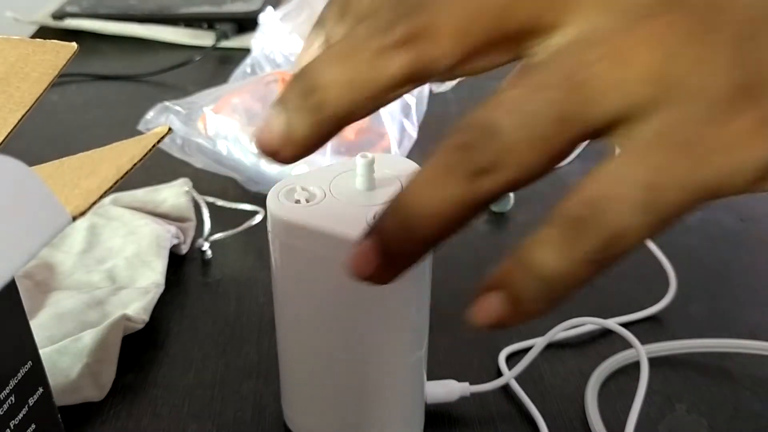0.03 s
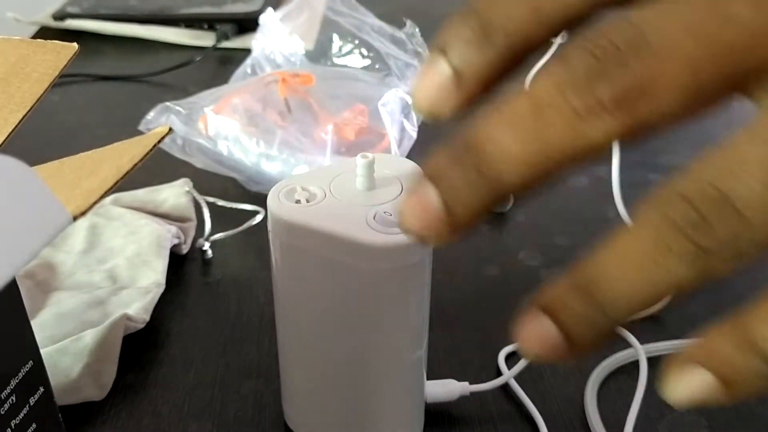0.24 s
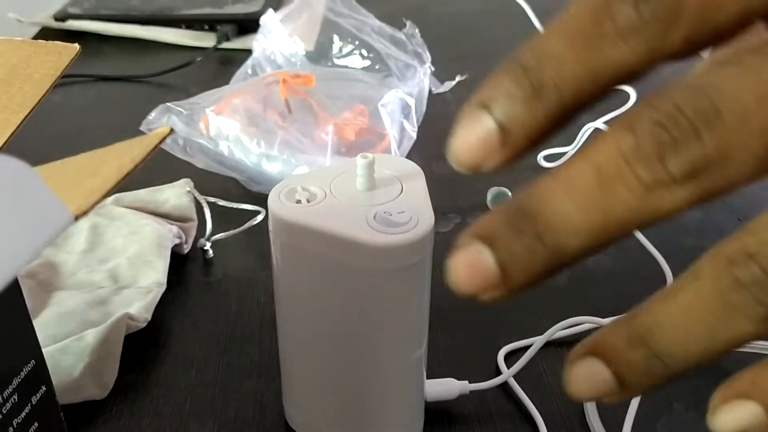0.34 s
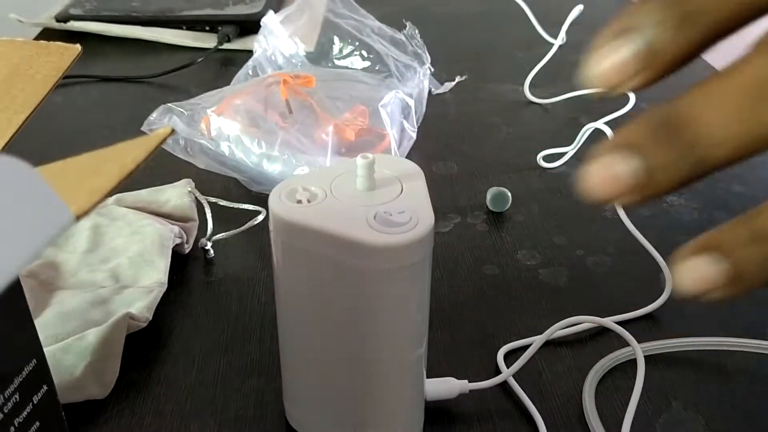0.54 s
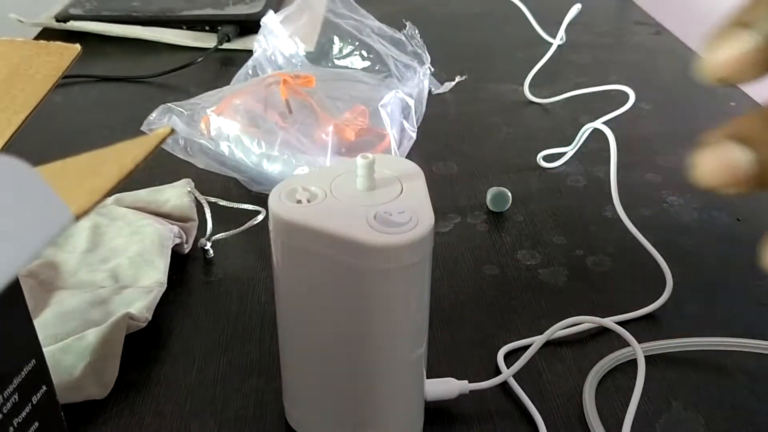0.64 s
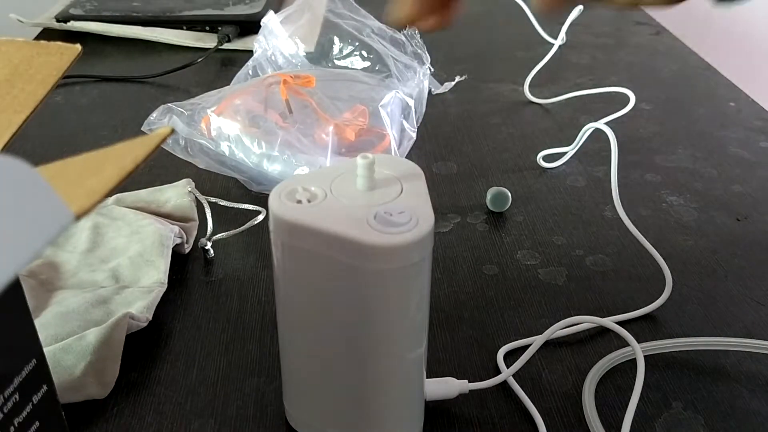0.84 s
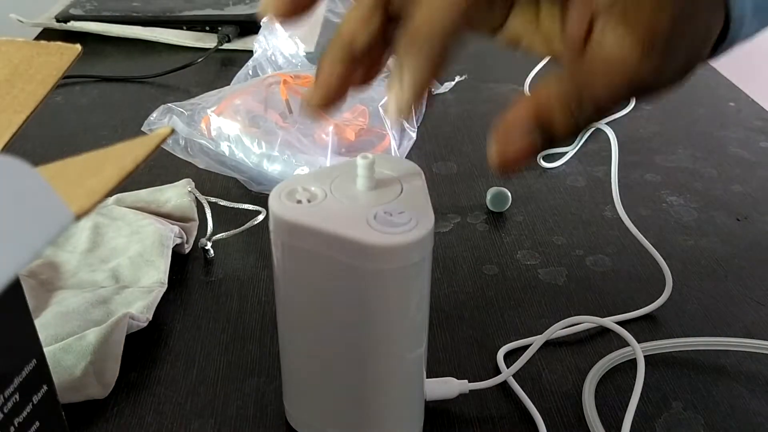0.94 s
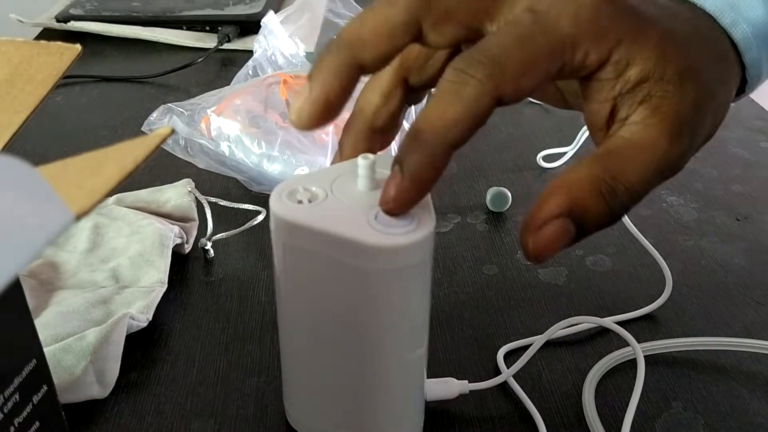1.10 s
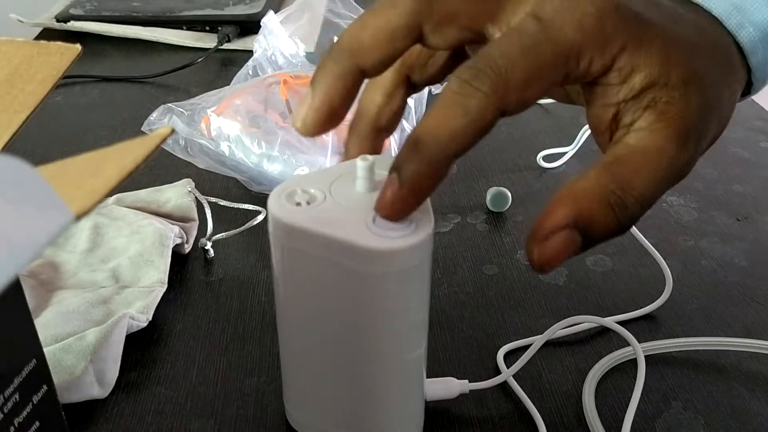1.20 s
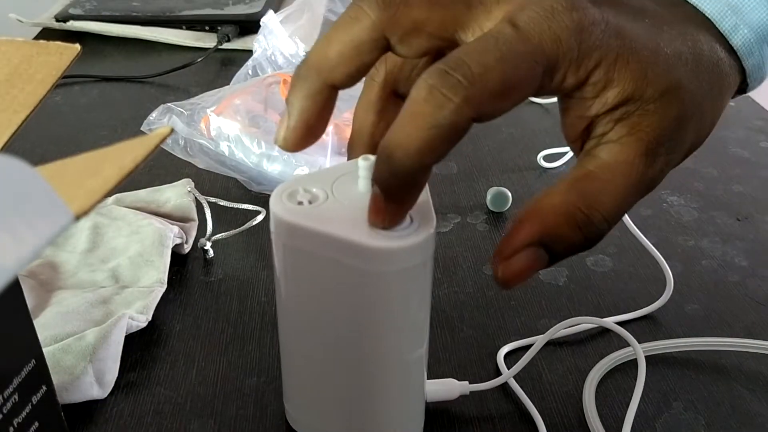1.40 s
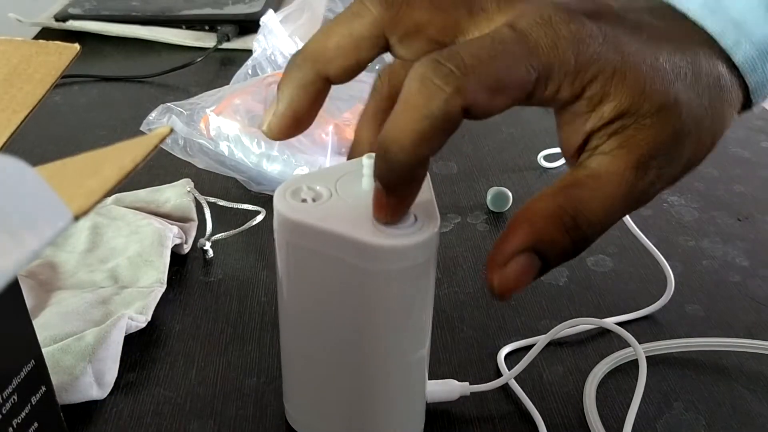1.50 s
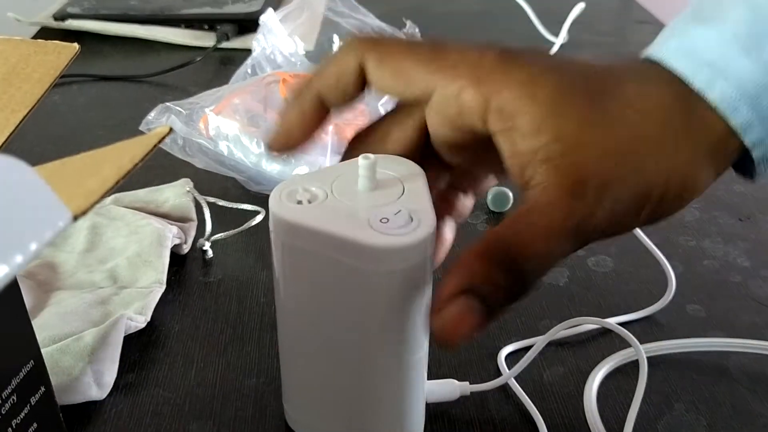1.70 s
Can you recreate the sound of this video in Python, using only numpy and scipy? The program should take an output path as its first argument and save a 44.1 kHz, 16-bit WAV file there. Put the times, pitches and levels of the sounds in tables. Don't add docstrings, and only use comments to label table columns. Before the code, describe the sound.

Small electric air pump buzzes and hisses steadily after a sharp snap, then clicks and winds down.

```python
import sys
import numpy as np
from scipy import signal
from scipy.fft import rfft, irfft, next_fast_len
from scipy.io import wavfile
from scipy.ndimage import uniform_filter1d, minimum_filter1d, map_coordinates

SR = 44100
rng = np.random.default_rng(int(sys.argv[2]) if len(sys.argv) > 2 else 0)


def magnitude_from_level(level_db):
    exponent = np.asarray(level_db, float) / 20
    return 10 ** exponent


def dump_mix(stems):
    frames = np.atleast_2d(stems).T
    limited = np.clip(frames, -1, 1)
    pcm = np.round(limited * 32767).astype(np.int16)
    wavfile.write(sys.argv[1], SR, pcm)


N = 77175


def unit(x):
    return x / np.sqrt(np.mean(x ** 2) + 1e-20)


def along(points, hz):
    f, v = np.transpose(points)
    return np.interp(np.log(hz + 1), np.log(f + 1), v)


def over_time(points):
    return np.interp(np.arange(N) / SR, *np.transpose(points))


def wobble(rate):
    knots = rng.standard_normal(int(N * 100 / SR) + 4)
    return map_coordinates(knots, [np.arange(N) * min(rate, 99) / SR])


def filtered(x, response):
    m = next_fast_len(N + 8192)
    return irfft(rfft(x, m) * response(np.fft.rfftfreq(m, 1 / SR)), m)[..., :N]


def rush(gain, patchy_db):
    # pitch_hz, left-right likeness (0-1)
    alike = [(60, 0.48), (150, 0.98), (350, 0.9), (700, 0.17), (1400, 0.007), (15000, 0.0068)]
    z = signal.stft(rng.standard_normal((2, N)), nperseg=512)[2]
    patches = uniform_filter1d(rng.standard_normal(z.shape[1:]), size=5, axis=0)
    patches = uniform_filter1d(patches, size=6, axis=1)
    pair = signal.istft(z * magnitude_from_level(patchy_db * unit(patches)), nperseg=512)[1][:, :N]

    def mid_and_side(hz):
        turn = np.arccos(np.clip(along(alike, hz), -1, 1)) / 2
        return gain(hz) * [np.cos(turn), np.sin(turn)]
    mid, side = filtered(pair, mid_and_side)
    return unit(np.array([mid + side, mid - side]))


def rumble():
    # pitch_hz, level_db per Hz
    colour = [(25, -23), (55, -19), (80, -10), (160, -4.5), (300, 2.34), (700, -10.5), (1800, -16.5),
              (12000, -22.5)]
    # time_s, level_db
    distant = [(0, 2.5), (.15, 2), (.45, 1.5), (.56, -1), (1.38, -1), (1.46, 5), (1.6, 1.5), (1.75, 1)]
    level_db = -47.5 + over_time(distant) + 0.32 * wobble(7.6)
    return magnitude_from_level(level_db) * rush(lambda hz: magnitude_from_level(along(colour, hz)), patchy_db=2.5)


def whines():
    pitches = [50, 108, 218, 404, 1190, 13720, 8441, 9290, 3004]
    # level_db (rms), left_over_right_db
    levels = [(-68.5, 2), (-61, 1.5), (-64, 0), (-65, -23), (-90, -9), (-68.5, 14), (-72, -29), (-68, 15),
              (-66, -9)]
    # time_s, level_db (rms)
    charger_level = [(0, -60), (.1, -52), (.15, -63), (.22, -59), (.6, -63), (.72, -54), (.86, -55),
                     (.93, -66), (1.0, -59), (1.07, -55), (1.11, -63), (1.2, -57), (1.38, -63), (1.6, -65),
                     (1.64, -59), (1.75, -61)]
    t = np.arange(N) / SR
    total = np.zeros((2, N))
    for hz, (db, pan_db) in zip(pitches, levels):
        fade_db = -2 * t * (4000 < hz < 9000)
        level_db = db + 2.6 * np.tanh(wobble(21.7)) + fade_db
        tone = np.sqrt(2) * magnitude_from_level(level_db) * np.sin(2 * np.pi * hz * t + 0.9 * wobble(29.78))
        total += tone * magnitude_from_level([[pan_db / 2], [-pan_db / 2]])
    charger = magnitude_from_level(over_time(charger_level) + 1.5 * wobble(40))
    charger = charger * np.sin(2 * np.pi * 6007 * t + 1.1 * wobble(60))
    pan_db = -20
    return total + 1.75 * charger * magnitude_from_level([[pan_db / 2], [-pan_db / 2]]) * magnitude_from_level(5.5 - abs(pan_db) / 2)


def sleeve():
    # time_s, level_db
    rustle = [(0, -58), (.085, -62.5), (.1, -49.5), (.17, -50), (.22, -54.5), (.4, -83)]
    colour = [(500, 6.5), (1500, 12.0), (10000, -22.5)]  # pitch_hz, level_db
    cloth = rush(lambda hz: magnitude_from_level(along(colour, hz)), patchy_db=-5.5)
    return magnitude_from_level(over_time(rustle) + wobble(53.5)) * cloth


def cable():
    # time_s, level_db
    ticks = [
        (.1, -63),
        (0.151, -38),
    ]
    colour = [(6000, -38), (9200, 31.0), (12000, -60)]  # pitch_hz, level_db
    t = np.arange(N) / SR
    shape = sum(magnitude_from_level(db) * np.exp(-abs(t - s) / 0.0012) for s, db in ticks)
    return shape * rush(lambda hz: magnitude_from_level(along(colour, hz)), patchy_db=8)


def echoes(tone, start_s, room_db):
    # pitch_hz, fade_s
    walls = [(300, 0.79), (1600, 0.87), (2200, 0.58), (4000, 0.79), (8000, 0.82), (12000, 0.5),
             (13000, 0.43), (14000, 0.34)]
    # pitch_hz, level_db
    wall_tone = [(300, -15), (1600, 0.5), (4000, 0), (8000, -3.5), (12000, -2), (14000, -1.5)]
    # pitch_hz, width_hz, level_db
    room_modes = [(766, 78, 8), (1632, 48, 9), (2100, 100, -11), (2450, 190, 4), (2950, 102, 5.5),
                  (3440, 160, 1), (3580, 90, 4.5), (1096, 57, -10)]
    hz, u, z = signal.stft(rng.standard_normal((2, SR)), SR, nperseg=128)
    lumps_db = 3 * np.tanh(rng.standard_normal(len(u))) * np.exp(-u / .1)
    colour_db = (along(wall_tone, hz) + along(tone, hz))[:, None]
    fade_db = 60 * u / along(walls, hz)[:, None]
    tail = signal.istft(z * magnitude_from_level(lumps_db + colour_db - fade_db), SR, nperseg=128)[1]

    def modes(f):
        return magnitude_from_level(sum(db * np.exp(-((f - c) / w) ** 2) for c, w, db in room_modes))
    tail = filtered(tail, modes)
    tail = tail * np.minimum(np.arange(tail.shape[1]) / (.002 * SR), 1)
    first_wall_s = .008
    delay = round((start_s + first_wall_s) * SR)
    return magnitude_from_level(room_db) * np.pad(tail / np.linalg.norm(tail[0]), ((0, 0), (delay, N)))[:, :N]


def crack(bursts, tone, modes, room_db):
    t = np.arange(N) / SR
    shape = 0
    for s, db, rise, fall in bursts:
        shape = shape + magnitude_from_level(db) * np.exp(-np.where(t < s, (s - t) / rise, (t - s) / fall))
    ring = 0
    for hz, db in modes:
        ring = ring + magnitude_from_level(db) * np.sin(2 * np.pi * hz * t + rng.uniform(0, 2 * np.pi, (2, 1)))
    noise = rush(lambda hz: magnitude_from_level(along(tone, hz)), patchy_db=1)
    near = shape * (.35 * unit(ring) + .65 * noise)
    near = filtered(near, lambda f: f ** 2 / (f ** 2 + 300 ** 2))
    near = near / np.linalg.norm(near, axis=1)[:, None]
    near = near * magnitude_from_level([[1], [-1]])
    return (near + echoes(tone, bursts[0][0], room_db)) * np.linalg.norm(shape)


def snap():
    # start_s, level_db, rise_s, fall_s
    bursts = [
        (.2377, -11.5, 0.00088, 0.00045),
        (.2396, -13.5, .0004, 0.00043),
        (.241, -25.5, 0.0025, 0.0061),
    ]
    # pitch_hz, level_db per Hz
    tone = [(170, -34), (600, -6.5), (1000, -10.5), (1620, -6), (3300, -5.5), (4200, -7), (9900, 1),
            (11800, 5)]
    # pitch_hz, level_db
    modes = [(700, -0.5), (1250, -4), (1620, -7), (3550, -2), (5600, -3), (7000, -0.5), (9900, 9.5),
             (11500, 4.5)]
    return magnitude_from_level(6) * crack(bursts, tone, modes, room_db=3.5)


def button():
    # start_s, level_db, rise_s, fall_s
    bursts = [
        (1.4150, -16, .0005, .0004),
        (1.4160, -13, .0003, .0004),
        (1.4175, -22, .0004, .0012),
    ]
    # pitch_hz, level_db per Hz
    tone = [(1300, -35), (2100, -7.5), (3000, -10), (5000, -10), (5900, -11.5), (7500, -2), (9500, -7.5),
            (11800, 1.5)]
    # pitch_hz, level_db
    modes = [(2150, 2), (3000, 5), (3800, -4.5), (4900, 0.5), (7400, 11), (8300, 2), (10200, 9),
             (11700, 7.5)]
    return magnitude_from_level(6) * crack(bursts, tone, modes, room_db=-10)


def shaft_hum(speed, angle, effort_db):
    orders = [(1, -22), (2, -22), (3, -8.5), (4, 0), (5, -19), (6, -27), (7, -20.5), (8, -14), (9, -27),
              (10, -28), (11, -22), (12, -19), (13, -30), (14, -27), (15, -23), (16, -21), (17, -32),
              (18, -27), (19, -25), (20, -22), (21, -21), (22, -27), (23, -23), (24, -16), (25, -19),
              (26, -30), (27, -18), (28, -38), (29, -35), (30, -22), (31, -16), (32, -28), (33, -20),
              (34, -23), (35, -25), (36, -30), (37, -30)]
    # turns per s, level_db
    case = [(40, -16), (60, -13), (68, -4), (82, 0)]
    hum = np.zeros((2, N))
    for k, db in orders:
        start = rng.uniform(0, 2 * np.pi)
        side_db = 2.5 * rng.normal() * min(k / 24, 1)
        shift = np.pi * k * speed * 4e-5 * rng.normal(1, 1)
        left = magnitude_from_level(side_db / 2) * np.sin(k * angle + start - shift)
        right = magnitude_from_level(-side_db / 2) * np.sin(k * angle + start + shift)
        level_db = db + 1.2 * wobble(14.04) + 0.019 * k * effort_db
        hum += magnitude_from_level(level_db) * np.array([left, right])
    return np.sqrt(2) * magnitude_from_level(-44 + effort_db + along(case, speed)) * hum


def nozzle_hiss(angle, effort_db):
    # pitch_hz, level_db per Hz
    nozzle = [(150, -59), (600, -17), (2700, -19.5), (4000, -21), (6500, -20), (9500, -11), (11900, -10),
              (14000, -2)]
    # pitch_hz, width_hz, level_db
    jet = [(8064, 454, 0), (2690, 300, -7)]
    puff_depths = [(1, .1), (3, .15), (4, .22)]

    def colour(f):
        peaks = sum(magnitude_from_level(db) * f * w / abs(c * c - f * f + 1j * f * w) for c, w, db in jet)
        return magnitude_from_level(along(nozzle, f)) + peaks ** 2
    air = rush(colour, patchy_db=1.6)
    puffs = 1 + sum(depth * np.cos(k * angle + k * k) for k, depth in puff_depths)
    return magnitude_from_level(-34 + 1.34 * effort_db + 0.47 * wobble(29)) * puffs * air


def pump():
    # time_s, level_db
    effort = [
        (.3, -47),
        (.4, -40),
        (.47, 1),
        (.52, 2),
        (.6, 2.6),
        (1.42, 2.5),
        (1.47, 0.5),
        (1.54, -6),
        (1.62, -12.5),
        (1.75, -16),
    ]
    t = np.arange(N) / SR
    on_s, spin_up_s, off_s, coast_s = .42, .036, 1.417, .22
    spin_up = 1 - np.exp(-np.maximum(t - on_s, 0) / spin_up_s)
    coast = np.exp(-np.maximum(t - off_s, 0) / coast_s)
    speed = 81.74 * spin_up * coast
    angle = 2 * np.pi * np.cumsum(speed) / SR + .01 * wobble(23.17)
    effort_db = over_time(effort)
    return shaft_hum(speed, angle, effort_db) + nozzle_hiss(angle, effort_db)


def scene():
    return rumble() + whines() + sleeve() + cable() + snap() + button() + pump()


def ports(dry):
    # pitch_hz, left_over_right_db
    left_over_right = [(200, -0.5), (400, 4.5), (700, -1.5), (4400, 1), (8000, 1.2), (10000, 5),
                       (11800, 11.5), (14000, 13.5)]

    def response(hz):
        tilt = along(left_over_right, hz)
        edge_hz = 12060
        both = np.where(hz > edge_hz, -9.5 - 20 * np.exp(-abs(hz - edge_hz) / 510), 0)
        both = both - 30 * np.clip((hz - 14300) / 2000, 0, 2)
        both = both + 5 * np.exp(-((hz - 11750) / 450) ** 2)
        left = np.minimum(tilt / 2, 2)
        return magnitude_from_level(both + np.array([left, left - tilt]))
    return filtered(dry, response)


def thinned(x):
    # pitch_hz, level_db
    mute = [(700, -52), (1400, -45), (2300, -41), (3500, -39.3), (5000, -39.3), (7200, -37), (11900, -42),
            (12100, -39)]
    size, first = 1024, 124
    edges = (np.diff(x, append=0) ** 2).sum(0)
    calm = uniform_filter1d(edges, size=128) < magnitude_from_level(2 * 6) * uniform_filter1d(edges, size=2 * size)
    calm = uniform_filter1d(minimum_filter1d(calm * 1., size=256), size=96)
    k = np.arange(2 * size)[:, None] + .5
    window = np.sqrt(2 / size) * np.sin(np.pi * k / (2 * size))
    basis = window * np.cos(np.pi / size * (k + size / 2) * k[:size].T)
    lead = 2 * size - first
    blocks = np.pad(x * calm, ((0, 0), (lead, 2 * size + -(N + lead) % size))).reshape(2, -1, size)
    z = np.concatenate([blocks[:, :-1], blocks[:, 1:]], axis=2) @ basis
    power = z ** 2
    limit = power.sum(2).mean(0)[:, None] * magnitude_from_level(2 * along(mute, k[:size, 0] * SR / (2 * size)))
    band = np.repeat(power.mean(0).reshape(-1, size // 8, 8).mean(2), 8, axis=1)
    keep = (power > limit) & (band > limit * magnitude_from_level(2 * 0.3))
    back = (z * keep) @ basis.T
    joined = (back[:, 1:, :size] + back[:, :-1, size:]).reshape(2, -1)
    return joined[:, lead - size:][:, :N] + x * (1 - calm)


def low_pass(x):
    return signal.sosfilt(signal.butter(12, 16380, fs=SR, output="sos"), x)


def record(dry):
    mix = thinned(ports(dry))
    return low_pass(mix)


dry = scene()
out = record(dry)
dump_mix(out)
```